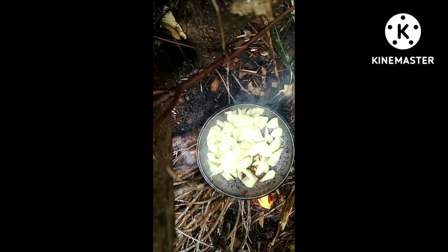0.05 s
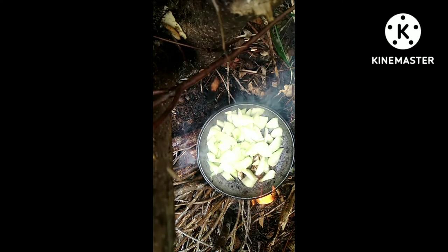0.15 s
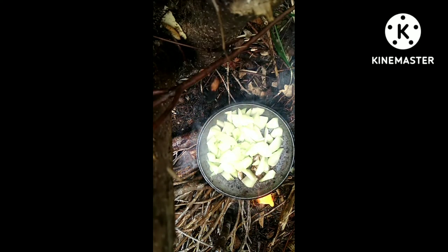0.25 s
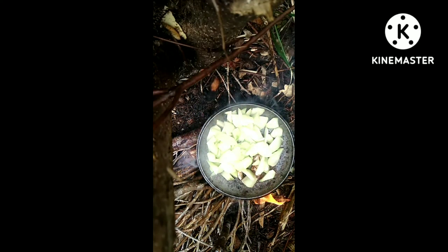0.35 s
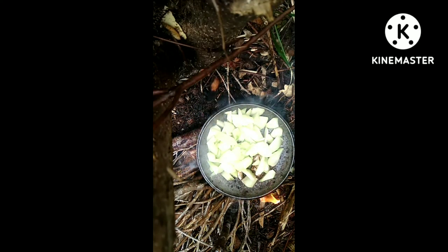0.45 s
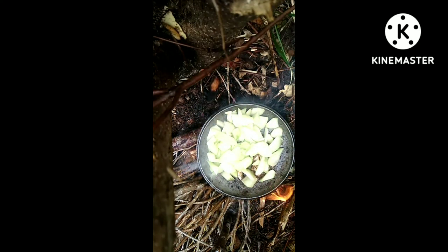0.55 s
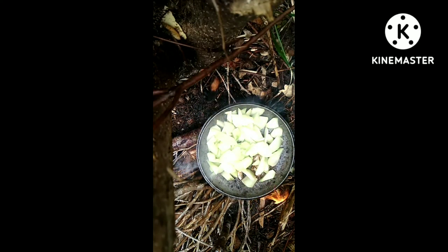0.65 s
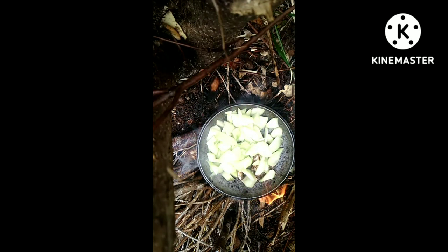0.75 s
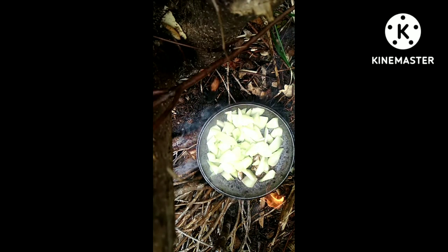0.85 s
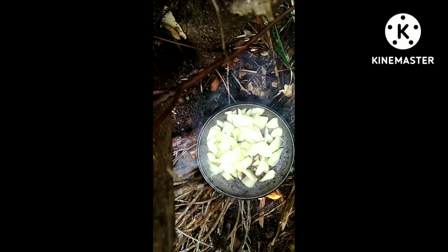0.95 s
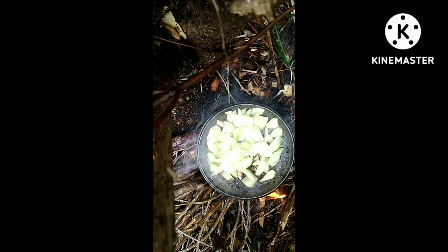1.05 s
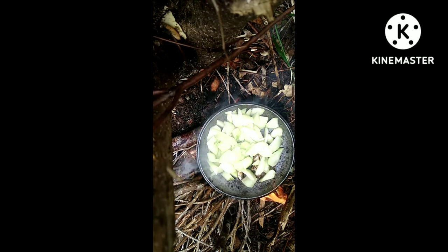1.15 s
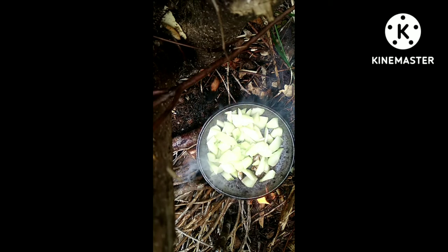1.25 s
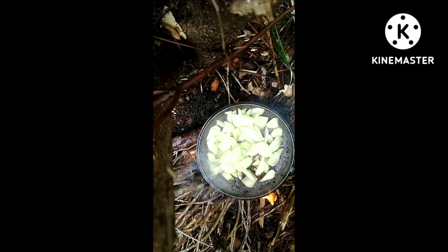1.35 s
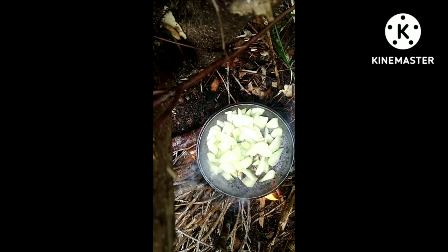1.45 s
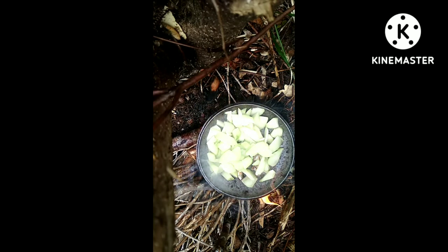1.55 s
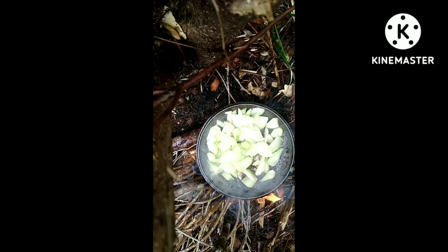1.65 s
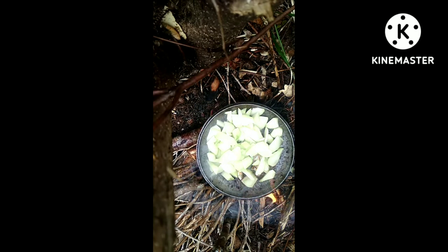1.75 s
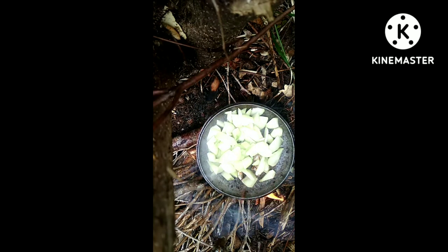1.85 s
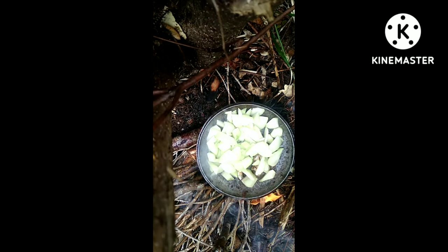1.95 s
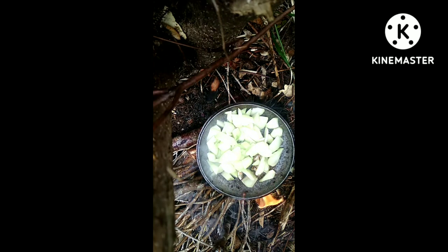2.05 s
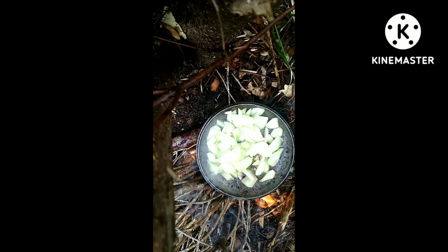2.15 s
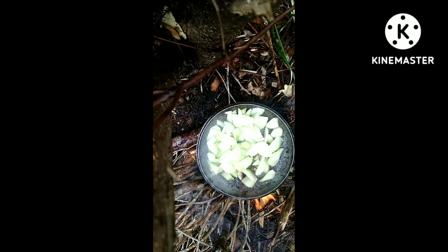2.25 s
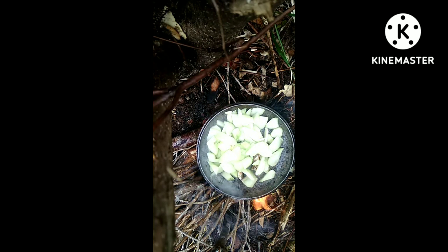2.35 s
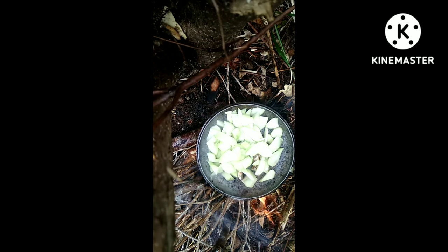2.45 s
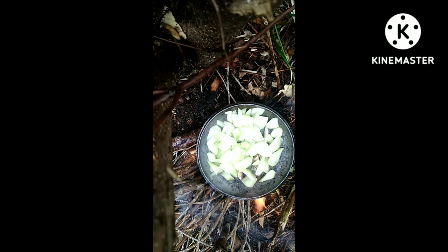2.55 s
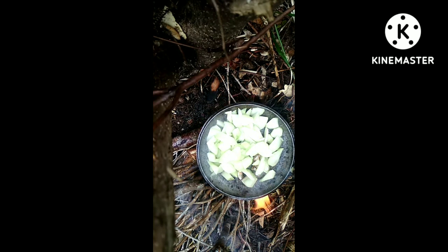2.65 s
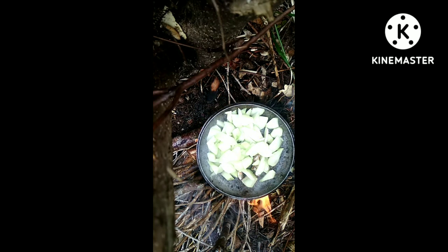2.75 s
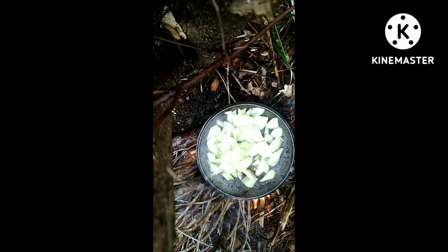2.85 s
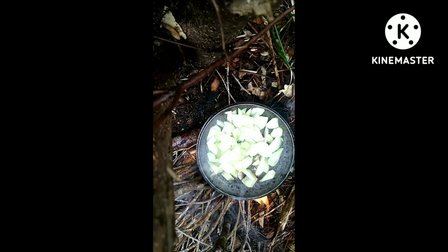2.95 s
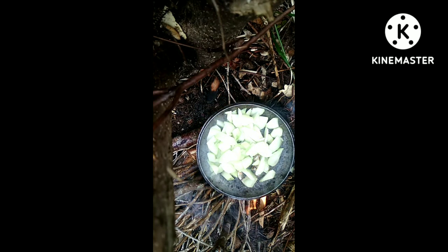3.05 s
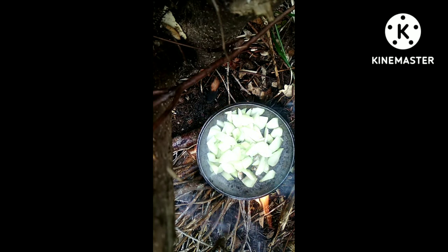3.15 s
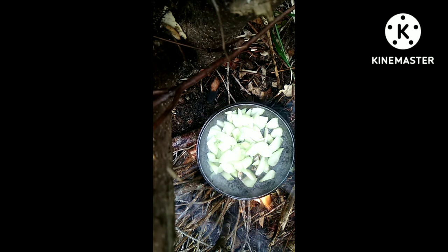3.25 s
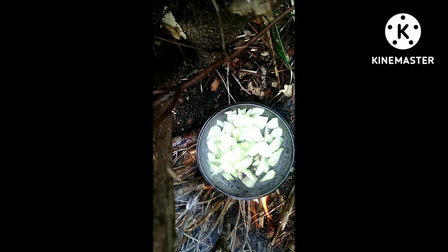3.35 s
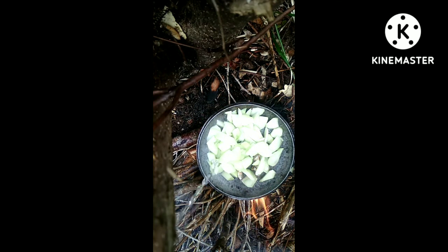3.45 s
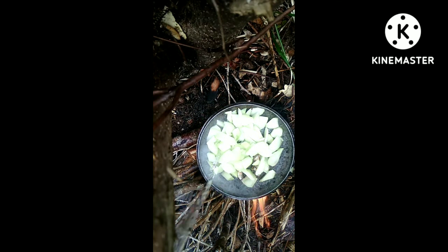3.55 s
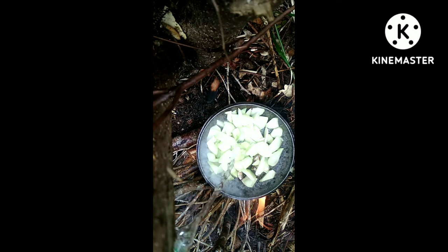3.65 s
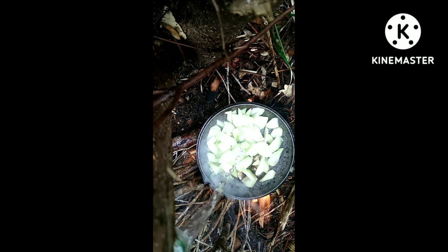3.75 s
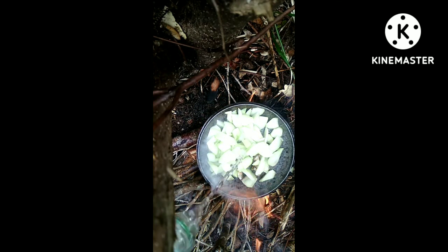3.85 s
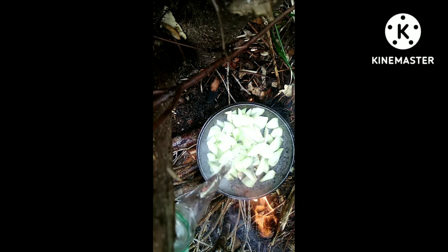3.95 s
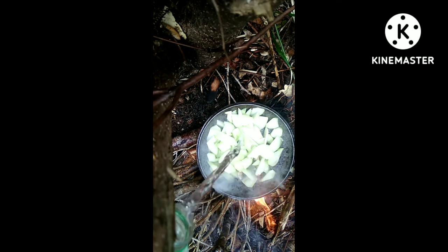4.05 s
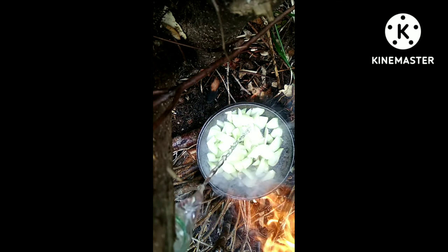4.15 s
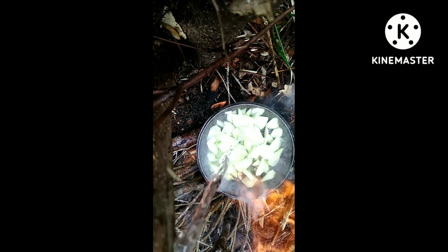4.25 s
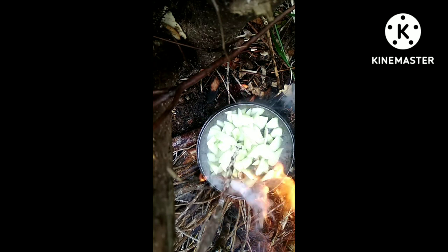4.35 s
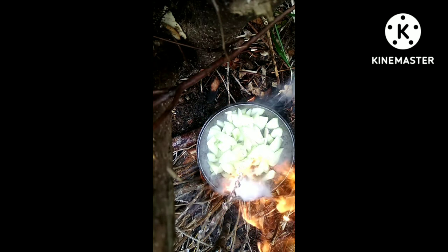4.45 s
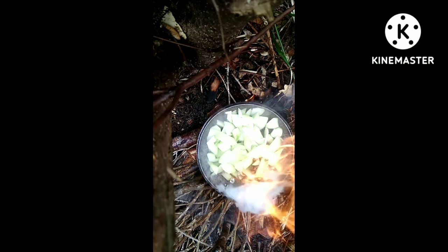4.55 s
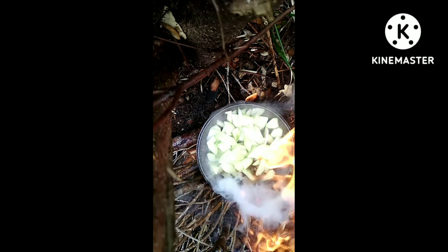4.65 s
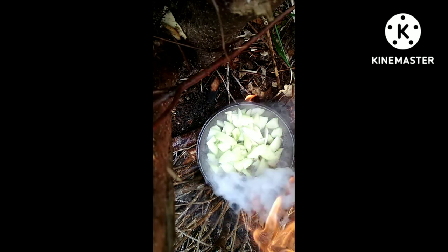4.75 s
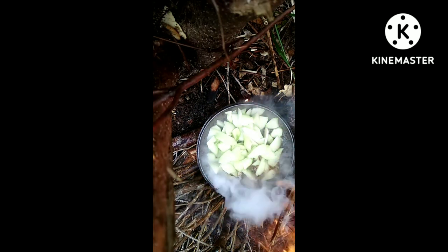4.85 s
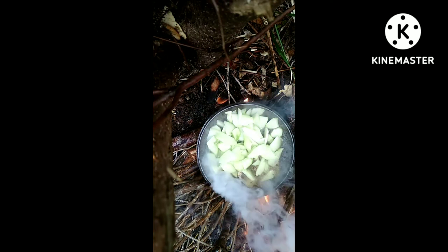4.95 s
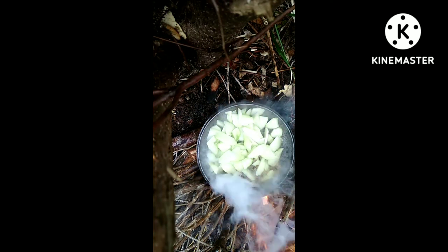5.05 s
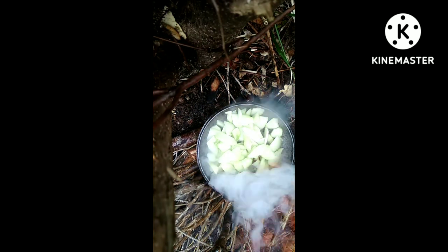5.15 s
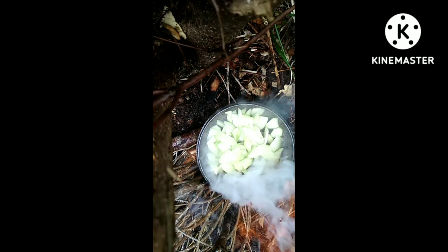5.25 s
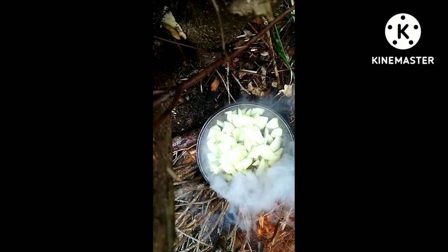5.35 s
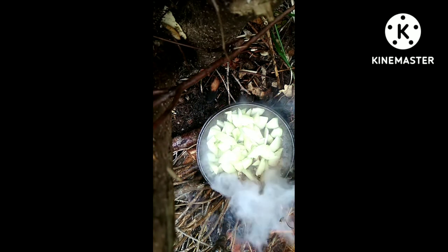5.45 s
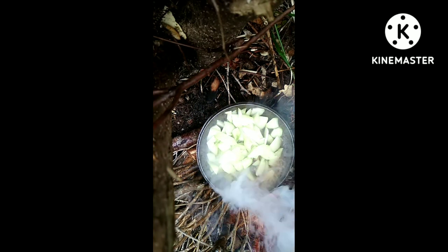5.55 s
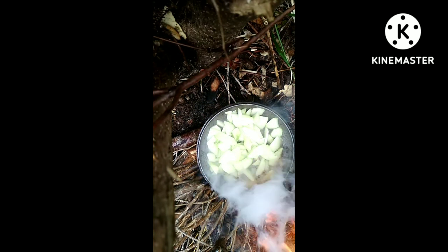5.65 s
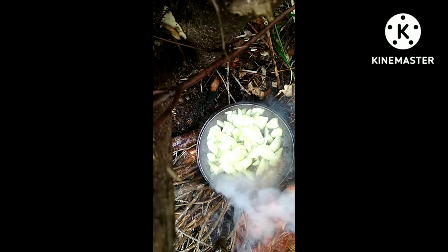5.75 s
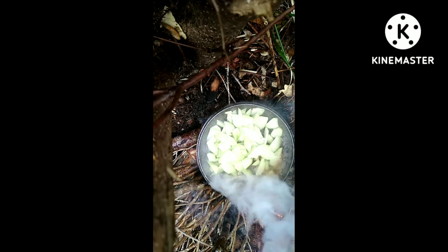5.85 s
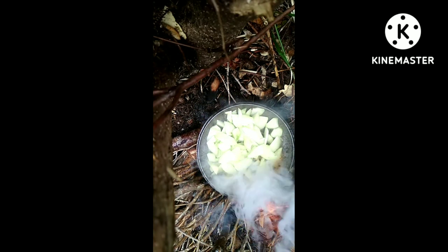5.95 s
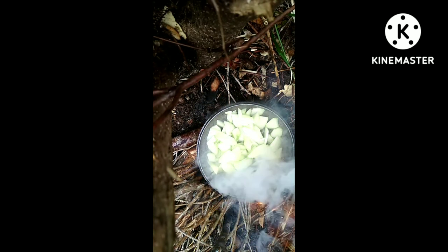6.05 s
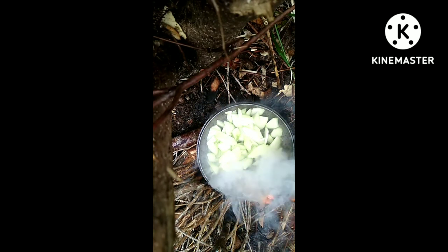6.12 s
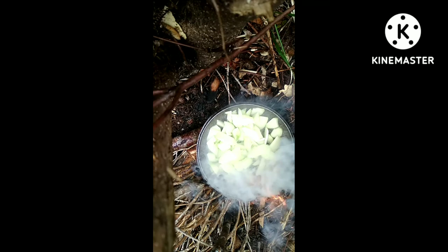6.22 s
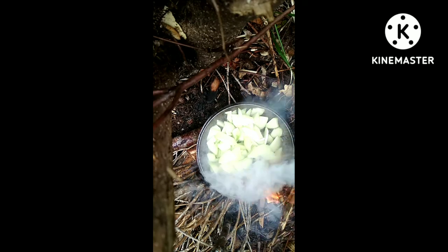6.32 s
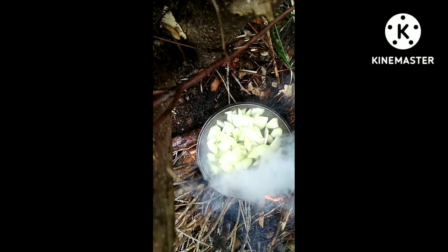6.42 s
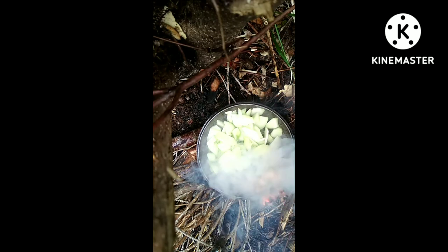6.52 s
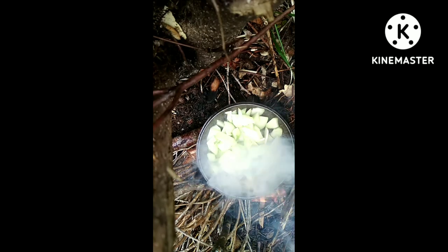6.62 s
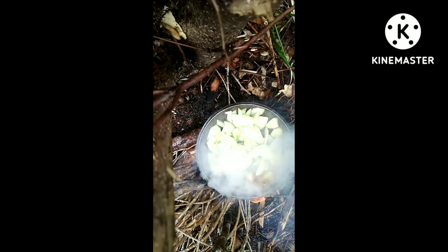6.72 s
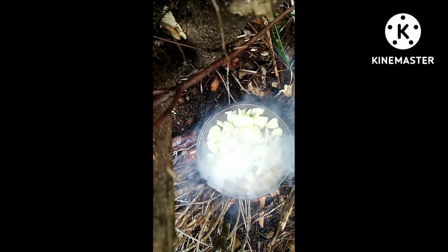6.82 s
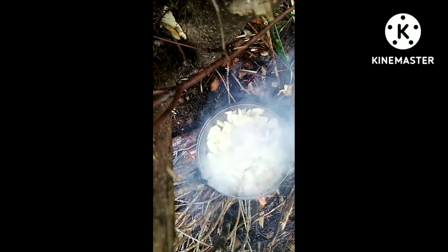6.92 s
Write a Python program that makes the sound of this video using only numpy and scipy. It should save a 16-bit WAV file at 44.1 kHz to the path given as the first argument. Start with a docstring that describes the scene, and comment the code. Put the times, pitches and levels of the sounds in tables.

```python
"""Frying over a twig fire

Outdoors, a stereo microphone just above a metal pan of chopped vegetables. Steam bubbles sizzle in
the fat and water drops spit; underneath, twigs shift and crack and small flames flutter. A light
draught brushes the microphone. Oil is poured in, splutters and spills on the embers: the fire
flares up with a rough roar and slowly sinks."""
import sys
import numpy as np
from scipy import signal
from scipy.fft import rfft, irfft, next_fast_len
from scipy.io import wavfile

SR = 44100
rng = np.random.default_rng(int(sys.argv[2]) if len(sys.argv) > 2 else 0)


def transcribe(u):
    """Save the signal u as a 16-bit wav file named by the first command-line argument.

    u: samples, shape (n,) or (channels, n), limited to [-1, 1]; the rate is SR.
    q: integer samples, one column per channel.
    """
    v = np.clip(np.atleast_2d(u).T, -1, 1)
    q = np.round(v * 32767).astype(np.int16)
    wavfile.write(sys.argv[1], SR, q)


N = 307811
TIME = np.arange(N) / SR
PADDED = next_fast_len(N + 4096)
FREQ = np.maximum(np.fft.rfftfreq(PADDED, 1 / SR), 1)

# Course of the fizz in the pan: (time [s], relative level [dB], left-right [dB])
FIZZ_COURSE = [(0.0, -36.5, 1), (0.15, -36, 2), (0.25, -38.5, -6.0), (0.31, -38.5, 2), (0.62, -36, -3),
               (0.79, -35.5, 1), (0.85, -41, 1), (0.99, -37, -6), (1.2, -38, 0), (1.31, -38, -4),
               (1.43, -38, 1.5), (2.3, -36, 0.5), (4.95, -36, -2.0), (5.03, -34.5, 6), (5.19, -36, -0.5),
               (6.66, -36.5, 0), (6.85, -38, 5), (6.95, -37.5, 1)]
# Spectra of tiny bubbles, larger bubbles and oil boiling off: (frequency [Hz], relative level [dB])
FIZZ_SPECTRUM = [(3000, -77), (5000, -8), (6500, -3.5), (8000, -2), (10000, 0.5), (12500, 0), (14500, 1.5),
                 (15500, 1)]
BUBBLE_SPECTRUM = [(300, -24), (700, -9), (1100, -4), (1800, -2.5), (2700, 0.5), (3300, 0.5), (4200, 1.5),
                   (5200, 3), (6500, 1), (8000, 3.5), (11000, -27)]
SPLUTTER_SPECTRUM = [(500, -16), (900, -3.5), (1300, 2.5), (1950, 4.5), (2500, 1), (3100, -4.5),
                     (4200, -51), (7000, -51)]
# Spurts of steam:
# (time [s], half width [s], relative level [dB], pitch [Hz], bandwidth [octaves], left-right [dB])
STEAM_SPURTS = [(0.72, 0.087, -46, 5000, 0.7, -8), (1.33, 0.03, -45, 5400, 0.3, -15),
                (1.615, 0.056, -41.5, 5200, 0.32, -10), (1.62, 0.05, -47, 2700, 0.5, -2),
                (1.695, 0.03, -40, 4670, 0.24, -4), (2.33, 0.04, -44, 8200, 0.25, 10),
                (3.47, 0.05, -40, 6030, 0.51, -7), (3.65, 0.08, -49, 6100, 0.25, 5),
                (4.89, 0.11, -39, 4500, 1, -6), (5.03, 0.089, -44, 5000, 1.2, 9)]
# Water drops bursting in the fat: (time [s], relative level [dB], decay [s])
FAT_SPITS = [(.0615, -14.5, .0012), (.259, -24, .0009), (.513, -21, 0.0094), (.5178, -15, 0.0009),
             (.549, -13, 0.00043), (.566, -17, 0.0021), (.636, -14, 0.0014), (.679, -15, 0.00069),
             (1.069, -16, .0006), (1.086, -16, .0013), (1.137, -22, .0003), (1.189, -14, 0.00074),
             (1.219, -17.5, .0003), (1.259, -19.5, .0008), (1.330, -21, 0.0013), (1.357, -13, 0.00051),
             (1.627, -21, 0.0028), (1.715, -20, 0.0052), (1.903, -20.5, 0.0066), (1.923, -13, .0003),
             (1.980, -21, 0.0059), (2.428, -21, .0003), (3.255, -11, 0.00028)]
# Spectra of the flare's bright rush and deep roar: (frequency [Hz], relative level [dB])
RUSH_SPECTRUM = [(250, -13.5), (500, -11.5), (800, -0.5), (1100, 3), (1500, 2), (1950, -1), (2400, -7),
                 (3000, -36), (4000, -68), (7000, -55)]
ROAR_SPECTRUM = [(25, -20), (60, -4.5), (110, 4), (190, 2), (330, -1.5), (550, -1), (850, -4), (1500, -29)]
# How alike the roar is left and right: (frequency [Hz], likeness [0-1])
ROAR_COHERENCE = [(60, 0.7), (130, 0.64), (300, 0.14), (700, 0.5)]
# Surges of the flare: (peak time [s], rise [s], gain [dB], left-right [dB])
FLARE_SURGES = [(4.44, 0.085, 1.5, -1), (5.035, 0.04, 7, 8), (5.685, 0.022, 3, 1), (6.04, 0.014, 4.5, -1),
                (6.34, 0.015, 4, 2), (6.74, 0.018, 1.5, 1)]
# Twigs splitting:
# (time [s], level [dB], pitch [Hz], woody ring [0-1], knock relative to crack [dB], left-right [dB])
TWIG_CRACKS = [(0.062, -18.5, 2980, 0, -28, -19), (0.114, -29.5, 1600, 0.1, -4, -4),
               (1.329, -29, 1600, 0.2, -12, -6), (1.531, -27.5, 1340, 0.06, -2.5, -6),
               (1.577, -26, 1500, 0, -23, -7), (1.626, -30, 2210, 0, -16, -6),
               (1.629, -25, 2400, .2, -16, 1), (1.6453, -33, 900, 0, -15, -7),
               (2.0107, -38, 900, 0, -9, -2), (2.119, -31, 1800, 0, -11, -8),
               (2.2503, -26.5, 1210, 0, -3, 18), (2.4353, -25.5, 1040, 0, -8, -26),
               (2.5772, -27, 1820, 0.4, -22, -6), (2.8246, -19.5, 1580, 0.7, -2, -3),
               (2.8752, -34, 1200, 0, 3, -18), (2.882, -26, 870, 0, -6, -23),
               (3.0683, -31, 1350, 0.3, -28, -6), (3.121, -26.5, 2100, 0, -24, -3),
               (3.473, -24, 1610, 0.4, -17, -5), (3.5104, -13.5, 2000, 0, -17, -5),
               (3.537, -31, 1200, 0, -21, -6), (3.7031, -24, 1020, 0.15, -14, -2),
               (3.7856, -33, 984, 0, -3, -15), (3.8863, -25, 1100, .1, -20, -11),
               (3.9308, -32, 1000, 0, -2, -5), (4.017, -18, 1090, 0, -20, -8),
               (4.086, -19.5, 895, 0, -17, -15), (4.1483, -22, 1700, .1, -16, -9),
               (4.1852, -17, 1250, .1, -21, -6), (4.3346, -16, 1750, 0.4, -20, -12),
               (4.8526, -23, 1150, 0, -1, -15), (5.6618, -18, 900, 0.3, -13, -15),
               (5.699, -20, 1200, 0, 1, -15), (6.3414, -24, 950, .1, -3, 1), (6.412, -20, 1170, 0, -12, -2)]
# Sticks bumping in the pile: (time [s], level [dB], pitch [Hz], decay [s], left-right [dB])
STICK_KNOCKS = [(0.421, -42, 350, 0.0025, -2), (0.803, -34, 230, 0.0065, 2), (0.867, -32.5, 390, 0.0043, 0),
                (0.869, -40, 620, 0.0032, -7), (0.872, -38, 130, 0.011, -2), (0.904, -33.5, 400, 0.0026, 4),
                (1.002, -34, 560, 0.0016, -1), (1.027, -40, 640, 0.004, -3), (1.055, -49, 440, 0.004, -2),
                (1.102, -37, 480, 0.0025, 2), (1.109, -39, 696, 0.003, 0), (1.208, -45, 420, 0.003, -4),
                (1.316, -36, 418, .0016, -4), (1.338, -42, 220, .005, -2), (1.355, -41, 320, 0.0085, -1),
                (1.415, -41, 600, .0012, -3), (1.468, -43, 220, .004, 0), (2.114, -43, 503, .003, -4),
                (2.122, -32, 337, 0.0053, -5), (2.131, -42, 394, 0.0046, -6)]
# Twigs sliding over one another: (start [s], length [s], level [dB])
TWIG_SCUFFS = [(0.132, 0.27, -54.5), (0.782, 0.2, -48), (0.972, 0.18, -54), (1.313, 0.16, -48.5)]
# Deep puffs of flame and air: (time [s], level [dB], pitch [Hz], left-right [dB])
FLAME_PUFFS = [(2.452, -29, 96, -22), (6.158, -32, 160, -2), (6.54, -32, 130, -1)]
# Spectra of bark, small flames, wind on the microphone and embers: (frequency [Hz], relative level [dB])
SCUFF_SPECTRUM = [(40, -8), (110, 6), (220, -1), (400, -2), (620, -8), (820, -7.5), (1200, -16),
                  (2500, -34)]
FLUTTER_SPECTRUM = [(25, -20), (60, 5.5), (110, 5), (200, 0), (380, -6.5), (620, -12.5), (850, -10.5),
                    (1200, -8), (2500, -34)]
WIND_SPECTRUM = [(20, -5), (45, -0.5), (90, 3.5), (150, -5), (220, -19), (400, -69), (1000, -70)]
EMBER_SPECTRUM = [(200, -22), (600, -9), (1500, 19), (2800, 5), (5000, -11), (10000, -1)]
# Gusts on the microphone: (time [s], half width [s], level [dB], left-right [dB])
WIND_GUSTS = [(1.82, 0.02, -45, -17), (1.98, 0.02, -49, 19), (2.29, 0.056, -47.5, 14),
              (2.45, 0.094, -44.5, -5), (2.67, 0.28, -50.5, 3), (2.82, 0.049, -51, -8),
              (2.99, .035, -52, -2), (3.10, 0.055, -47, 6), (3.39, 0.059, -43.5, -10),
              (3.56, 0.14, -45.5, -13), (3.71, 0.042, -42, -11)]
# Balance of the microphone's two ports: (frequency [Hz], left-right [dB])
MIC_BALANCE = [(200, -1.5), (750, -2.5), (1100, -5), (1580, -8.5), (1900, -3.5), (2900, -3.5), (3600, -7),
               (4200, -3.5), (5300, -7.5), (7000, -9.5), (9500, -3), (13000, 1.5)]
# How alike the ports hear the pan and fire: (frequency [Hz], likeness [0-1])
MIC_COHERENCE = [(200, 1), (600, 1), (1100, 0.96), (1700, 0.41), (2400, 0.17), (3500, 0.16), (8000, 0.082),
                 (15000, 0.025)]
# Phase by which the left port trails the right: (frequency [Hz], lag [rad])
MIC_LAG = [(100, 0.31), (400, 0.72), (1050, 1.38), (1500, 1.87), (1800, -0.14), (2600, 0.86), (3300, 1.44),
           (7000, 0.92)]


def frying(bubbling_db=-43.5, fresh_oil_db=4, sputter_db=0.58):
    """Steam bubbles burst just below the microphone: tiny ones fizz, fewer large ones crackle."""
    course_db, side_db = in_time(FIZZ_COURSE)
    fizz = at_ports(bursts(per_s=11000, spread_db=2), FIZZ_SPECTRUM, at_hz(MIC_COHERENCE))
    fizz = clumped(fizz, depth_db=2, rate=19) * from_db(course_db + 3) * panned(side_db - side_db.mean())
    fresh_oil = swell(4.2, width_s=0.54)   # more bubbling as the new oil heats up
    crackle = at_ports(bursts(per_s=8000, spread_db=1), BUBBLE_SPECTRUM, at_hz(MIC_COHERENCE))
    crackle = clumped(crackle, depth_db=3, rate=15) * from_db(bubbling_db + fresh_oil_db * fresh_oil)
    return (fizz + crackle) * from_db(sputter_db * drift(21))


def boil_ups(gain_db=-3.5, rough_db=2):
    """Steam breaks out from under a piece of food in a short spurt of like-sized bubbles."""
    out, froth = 0, bursts(per_s=11000, spread_db=1)
    for s, width_s, db, hz, octaves, side_db in STEAM_SPURTS:
        spurt = rms_one(filtered(froth, hz * 2 ** (octaves * np.array([-.5, .5])), "band"))
        out = out + spurt * swell(s, width_s) * from_db(db) * panned(side_db)
    return out * from_db(gain_db + rough_db * drift(60))


def spits(gain_db=-4, tick_hz=11300, squirt_hz=4820, squirt_from_s=0.0011, small_per_s=14):
    """A water drop bursts in hot fat with a bright tick, or boils off in a longer, duller squirt."""
    out, t = np.zeros((2, N)), TIME[:2048]
    small_spits = [(s, -24.5, 0.0015) for s in TIME[rng.random(N) < small_per_s / SR]]
    for s, db, decay_s in list(FAT_SPITS) + small_spits:
        top_hz = squirt_hz + (tick_hz - squirt_hz) / (1 + (decay_s / squirt_from_s) ** 2)
        burst = rng.standard_normal((2, len(t))) * np.exp(-t / decay_s)
        tick = filtered(burst, [0.85 * squirt_hz, 1.165 * top_hz], "band")
        tick /= np.abs(tick).max(axis=1, keepdims=True)
        add(out, s, tick * from_db(db + gain_db) * panned(-9))
    return out


def splutter(pour_s=3.4, peak_s=4.14, peak_db=-37, spilled_db=-44.5, simmer_s=1.77, simmer_db=-51.5):
    """Oil boils off the hot rim and the embers in a dense patter, most as it is poured."""
    rise_db_per_s, fall_db_per_s = 16, 13
    pour_db = np.maximum(peak_db - fall_db_per_s * since(peak_s), spilled_db)
    pour_db -= rise_db_per_s * np.maximum(peak_s - TIME, 0)
    pour = from_db(pour_db) * (TIME > pour_s)
    simmer = from_db(simmer_db) * np.minimum(since(simmer_s) / 0.25, 1)   # the rim gets hot enough
    patter = at_ports(bursts(per_s=3000, spread_db=3), SPLUTTER_SPECTRUM, at_hz(MIC_COHERENCE))
    return clumped(patter, depth_db=3, rate=15.7) * np.hypot(pour, simmer)


def flare(ignition_s=3.667, rise_s=0.7, hold_s=0.97, burnout_s=6.66, flicker_db=0.96):
    """Spilled oil droplets ignite in quick succession, each sending out a small pressure pulse."""
    sink_db_per_s, burnout_db_per_s, dull_db_per_s, thin_db_per_s = 3, 12, 3.1, 4
    growth = np.minimum(since(ignition_s) / rise_s, 1) ** 1.5
    sinking_s = since(ignition_s + rise_s + hold_s)
    level_db = -36 - sink_db_per_s * sinking_s - burnout_db_per_s * since(burnout_s)
    surge_db = side_db = 0
    for s, surge_rise_s, db, lean_db in FLARE_SURGES:
        surge = swell(s, surge_rise_s, fall_ratio=2.74)
        surge_db += db * surge
        side_db += lean_db * surge
    rush = at_ports(bursts(per_s=4000, spread_db=0.5), RUSH_SPECTRUM, 0.51 * at_hz(MIC_COHERENCE))
    treble_db = 0.5 - dull_db_per_s * since(ignition_s)   # the top fades as the oil burns off
    rush += (from_db(treble_db) - 1) * filtered(rush, 1500, "high", order=1)
    rush *= from_db(3 + surge_db)
    roar = at_ports(bursts(per_s=2000, spread_db=3.5), ROAR_SPECTRUM, at_hz(ROAR_COHERENCE))
    roar *= from_db(0.4 + 0.98 * surge_db - thin_db_per_s * sinking_s)   # dies sooner than the rush
    return (rush + roar) * growth * from_db(level_db + flicker_db * drift(7.2)) * panned(side_db)


def cracks(scatter=0.072, scatter_s=0.0024, lag_s=0.0001, ring_cycles=1.1, knock_hz=165, knock_s=0.0024):
    """A twig splits with a sharp pulse that scatters and rings; the pile answers with a low knock."""
    out, t = np.zeros((2, N)), TIME[:2048]
    pile = filtered(np.cos(2 * np.pi * knock_hz * t) * np.exp(-t / knock_s), 800, "low")
    split = signal.unit_impulse(len(t))
    ports = np.array([np.roll(split, round(lag_s * SR)), split])   # the right port hears it first
    for s, db, hz, ring, knock_db, side_db in TWIG_CRACKS:
        twig = 2 * np.pi * hz / SR * np.cos(2 * np.pi * hz * t) * np.exp(-t * hz / ring_cycles)
        pulse = ports + ring * signal.fftconvolve(ports, [twig])[:, :len(t)]
        pulse += scatter * rng.standard_normal((2, len(t))) * np.exp(-t / scatter_s)
        pulse = filtered(pulse, 1.35 * hz, "low", order=4)
        pulse = filtered(pulse, 0.4 * hz, "high", order=1)
        crack = pulse / np.abs(pulse).max() + from_db(knock_db) * pile
        add(out, s, crack * from_db(db) * panned(side_db))
    return out


def knocks(grit=0.49):
    """A stick bumps its neighbours under the pan: a low, damped ring with the dry grit of bark."""
    out, t = np.zeros((2, N)), TIME[:4096]
    for s, db, hz, decay_s, side_db in STICK_KNOCKS:
        bark = rms_one(filtered(rng.standard_normal(len(t)), [0.25 * hz, 1.3 * hz], "band"))
        bump = (np.sin(2 * np.pi * hz * t) + grit * bark) * np.exp(-t / decay_s)
        add(out, s, bump / np.abs(bump).max() * from_db(db) * panned(side_db))
    return out


def scuffs(rough_db=2.5, sag_db_per_s=6):
    """Bark drags over bark in a dense run of small slips: a low, rough scuffing."""
    power = 0
    for s, length_s, db in TWIG_SCUFFS:
        drag = held(s, length_s, attack_s=0.018, release_s=0.033)
        power += (from_db(db - sag_db_per_s * since(s)) * drag) ** 2
    slips = at_ports(bursts(per_s=1500, spread_db=3), SCUFF_SPECTRUM, likeness=0.83)
    return slips * np.sqrt(power) * from_db(rough_db * drift(75))


def puffs(swell_cycles=0.93):
    """A flame flaps or an eddy passes: one dull swell, longer the deeper it is."""
    out, t = np.zeros((2, N)), TIME[:4096]
    for s, db, hz, side_db in FLAME_PUFFS:
        push = rng.standard_normal(len(t)) * t * np.exp(-t * hz / swell_cycles)
        flap = filtered(filtered(push, 1.25 * hz, "low", order=5), .5 * hz, "high")
        add(out, s, flap / np.abs(flap).max() * from_db(db) * panned(side_db))
    return out


def flames(start_db=-54.5, settle_db_per_s=1.5, flicker_db=2):
    """Small flames under the pan flap with soft, uneven pulses and gradually settle."""
    flutter = at_ports(bursts(per_s=650, spread_db=1), FLUTTER_SPECTRUM, likeness=0.93)
    return flutter * from_db(start_db - settle_db_per_s * TIME + flicker_db * drift(47))


def draught(breeze_db=-56, lump_db=1):
    """Eddies push right on the microphone, on each port separately; gusts strike one side harder."""
    power = (from_db(breeze_db) * held(1.65, length_s=2.5, attack_s=0.1, release_s=0.1)) ** 2
    for s, width_s, db, side_db in WIND_GUSTS:
        power = power + (from_db(db) * swell(s, width_s) * panned(side_db)) ** 2
    eddies = at_ports(rng.standard_normal((2, N)), WIND_SPECTRUM, likeness=0.064)
    return eddies * np.sqrt(power) * from_db(lump_db * drift(32))


def embers(level_db=-60.5):
    """Bark and glowing wood tick faintly behind everything else."""
    return from_db(level_db) * at_ports(bursts(per_s=70, spread_db=2.5), EMBER_SPECTRUM, likeness=1)


def at_ports(pair, spectrum, likeness):
    """Colour two unrelated signals and blend them as the microphone hears a source below it; rms 1."""
    right, unrelated = rfft(pair, PADDED) * from_db(at_hz(spectrum))
    left = likeness * right + np.sqrt(1 - likeness ** 2) * unrelated
    left *= np.exp(-1j * at_hz(MIC_LAG))
    ports = np.array([left, right]) * panned(at_hz(MIC_BALANCE))
    return rms_one(irfft(ports, PADDED)[:, :N])


def bursts(per_s, spread_db):
    """Two trains of random clicks, most small and a few large."""
    sizes = from_db(spread_db * np.minimum(rng.exponential(1, (2, N)), 4))
    clicks = sizes * rng.choice([-1, 1], (2, N)) * (rng.random((2, N)) < per_s / SR)
    return clicks / clicks.std()


def clumped(x, depth_db, rate, bands=26):
    """Bubbles of like size come in clumps: each band swells and fades on its own."""
    spectrum, out = rfft(x, PADDED), 0
    centres_hz = np.geomspace(1500, 15000, bands)
    for share in np.eye(bands):
        band = irfft(spectrum * at_hz(np.column_stack([centres_hz, share])), PADDED)[:, :N]
        out = out + band * from_db(depth_db * np.array([drift(rate), drift(rate)]))
    return rms_one(out)


def drift(rate):
    """A random wander of rms 1, mostly slower than rate [Hz]."""
    step, run_in = 40, 2000
    pole = np.exp(-2 * np.pi * rate * step / SR)
    noise = rng.standard_normal(N // step + run_in + 2)
    slow = signal.lfilter([1], [1, -2 * pole, pole * pole], noise)[run_in:]
    return np.interp(np.arange(N) / step, np.arange(len(slow)), rms_one(slow))


def held(s, length_s, attack_s, release_s):
    """Gain that rises from time s, holds at 1 and is released after its length."""
    return np.clip((TIME - s) / attack_s, 0, 1) * np.clip(1 - (TIME - s - length_s) / release_s, 0, 1)


def swell(s, width_s, fall_ratio=1):
    """A smooth bump of height 1 around time s, whose fall may be stretched."""
    return np.exp(-((TIME - s) / np.where(TIME < s, width_s, fall_ratio * width_s)) ** 2)


def since(s):
    """Seconds gone by after time s, 0 before it."""
    return np.maximum(TIME - s, 0)


def in_time(rows):
    """One curve over time for each value column of a table."""
    s, *columns = np.transpose(rows)
    return [np.interp(TIME, s, column) for column in columns]


def at_hz(points):
    """A table joined by lines on a log-frequency axis."""
    hz, value = np.transpose(points)
    return np.interp(np.log(FREQ), np.log(hz), value)


def from_db(db):
    """Decibels to gain."""
    return 10 ** (np.asarray(db) / 20)


def rms_one(x):
    """Scale so that the mean of the channels has rms 1."""
    return x / np.sqrt(np.mean(np.atleast_2d(x).mean(axis=0) ** 2) + 1e-20)


def panned(db):
    """Left and right gains of constant total power, the left louder by db."""
    gains = from_db(np.array([[.5], [-.5]]) * db)
    return gains / np.sqrt(np.mean(gains ** 2, axis=0))


def filtered(x, hz, kind, order=2):
    """Butterworth filter."""
    return signal.sosfilt(signal.butter(order, np.clip(hz, 15, .45 * SR), kind, fs=SR, output="sos"), x)


def add(out, s, sound):
    """Mix a short stereo sound in at time s."""
    start = max(round(s * SR), 0)
    out[:, start:start + sound.shape[1]] += sound[:, :N - start]


def scene():
    """Pan and fire at close range in the open air, with no room around them."""
    pan = frying() + boil_ups() + spits() + splutter()
    fire = flames() + puffs() + scuffs() + knocks() + cracks() + embers() + flare()
    return pan + fire + draught()


def record(dry, cutoff_hz=15520):
    """The recorder cuts the top of the treble steeply."""
    return signal.sosfilt(signal.ellip(12, .1, 80, cutoff_hz, fs=SR, output="sos"), dry)


dry = scene()
out = record(dry)
transcribe(out)
```